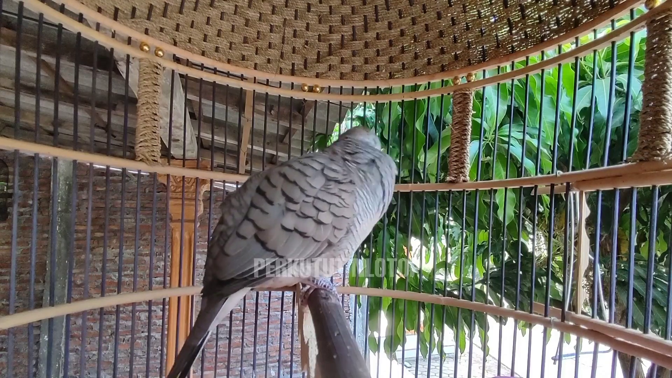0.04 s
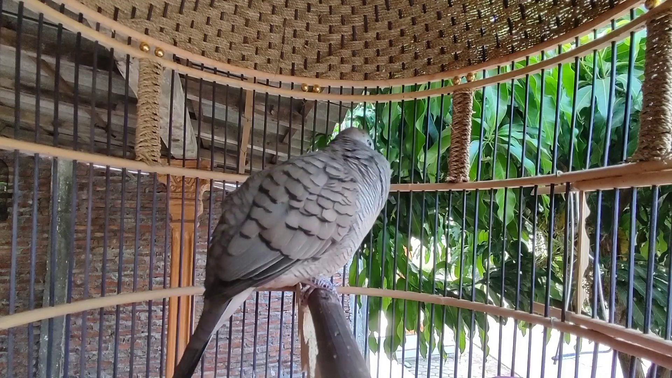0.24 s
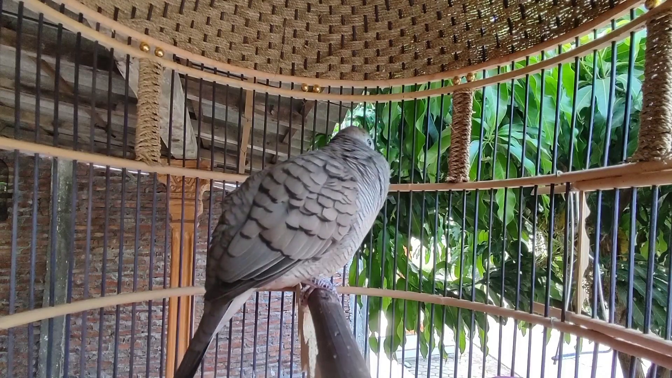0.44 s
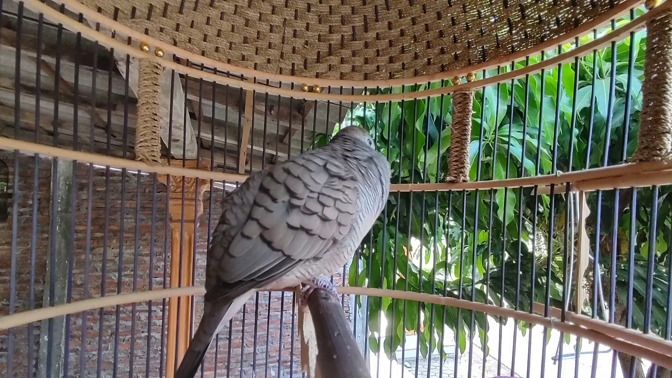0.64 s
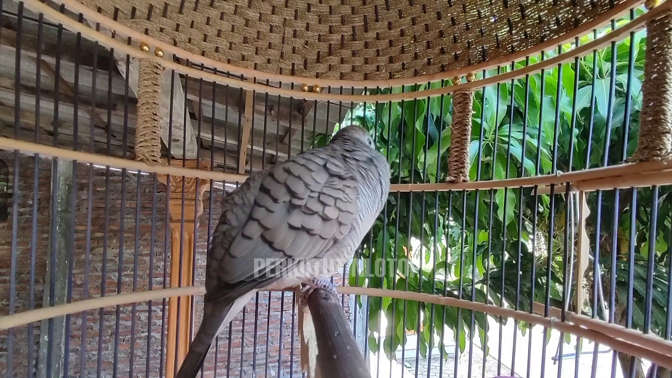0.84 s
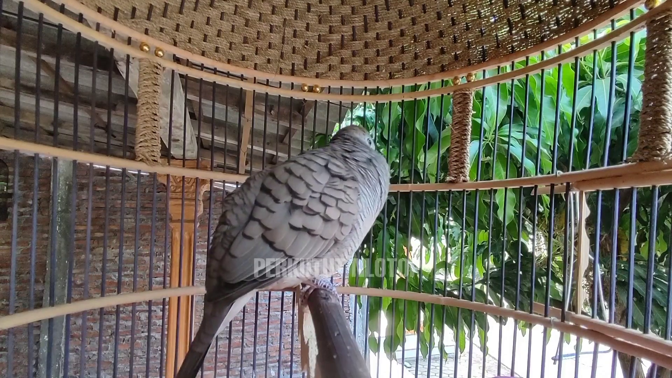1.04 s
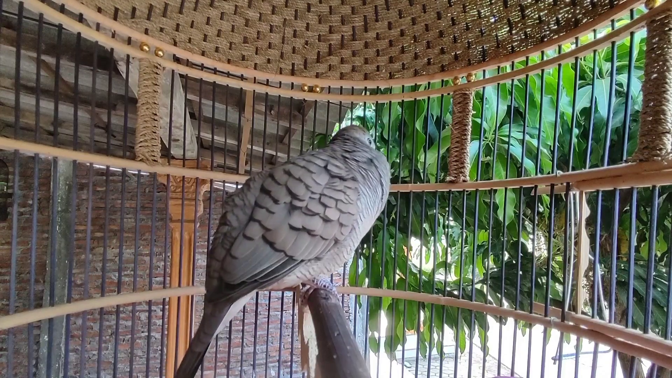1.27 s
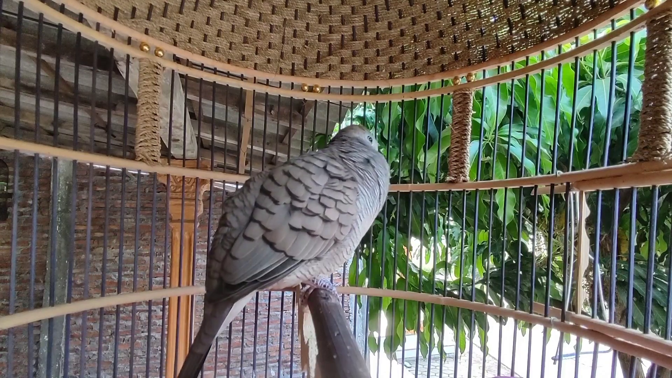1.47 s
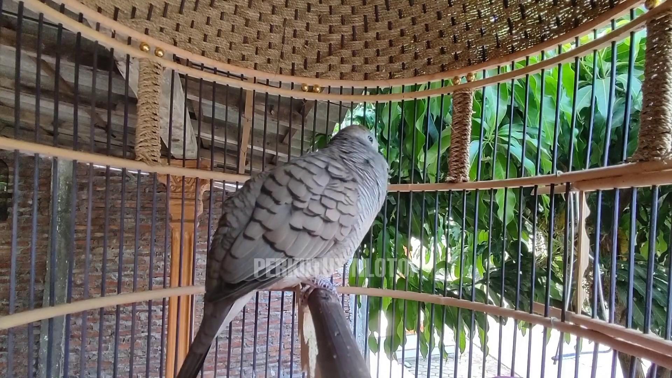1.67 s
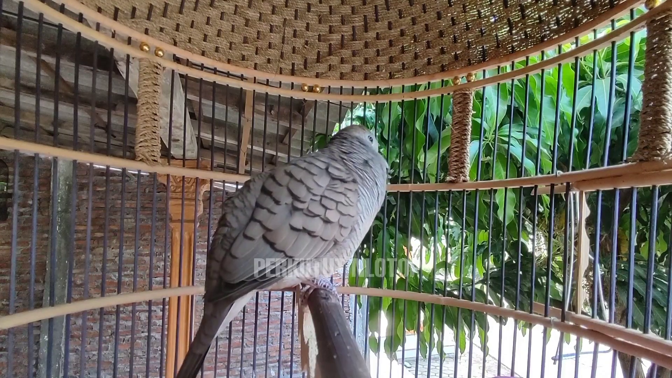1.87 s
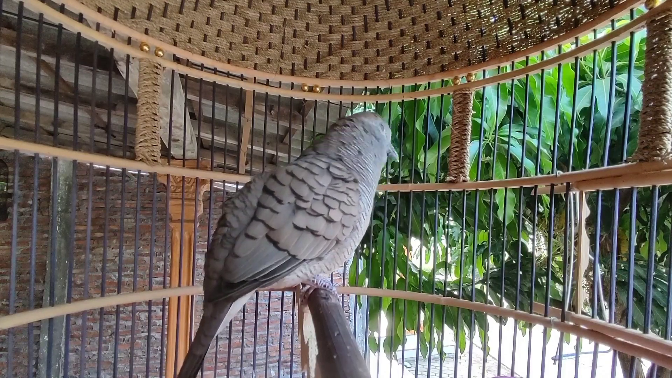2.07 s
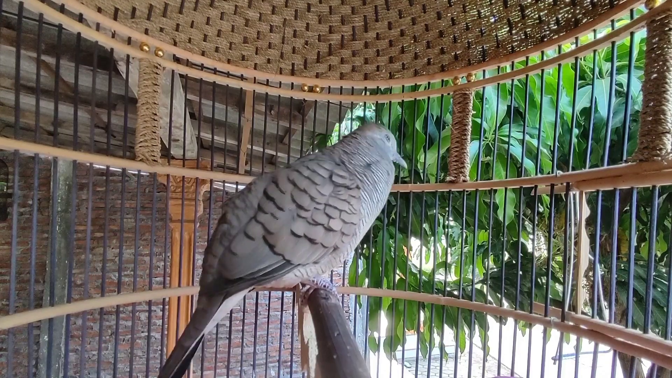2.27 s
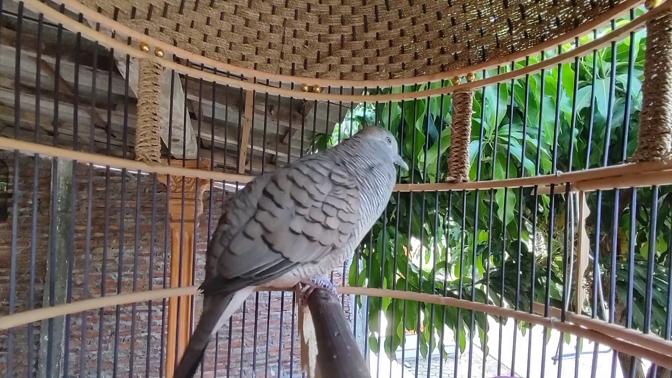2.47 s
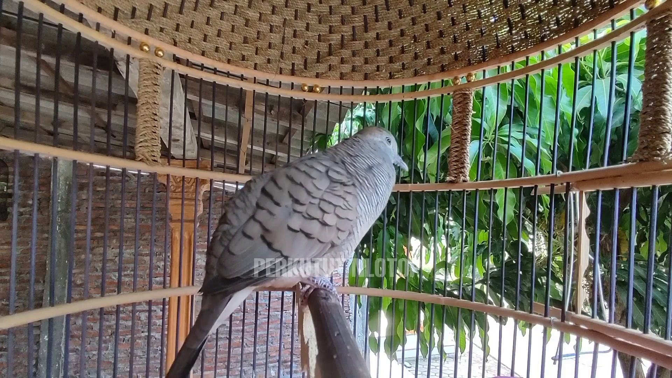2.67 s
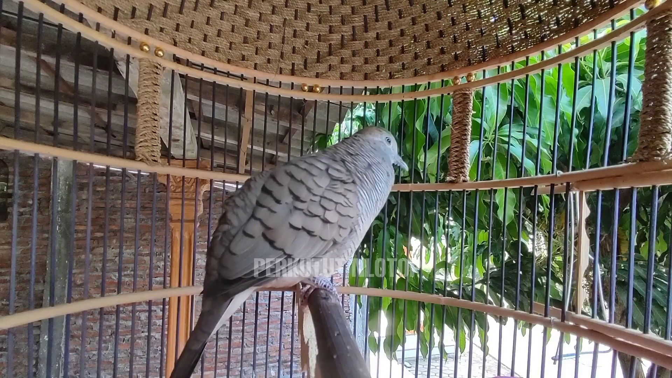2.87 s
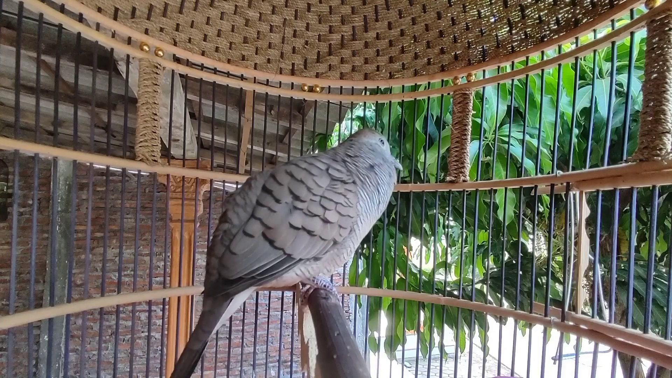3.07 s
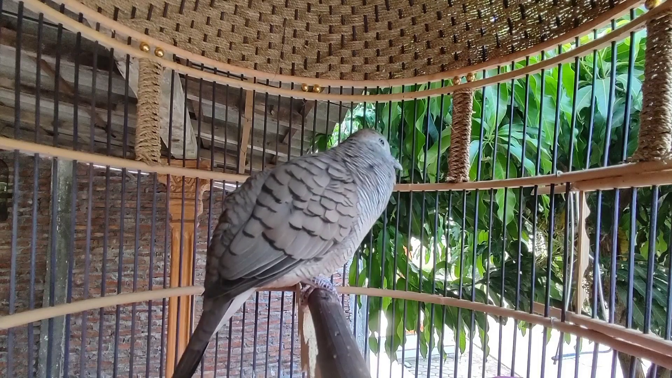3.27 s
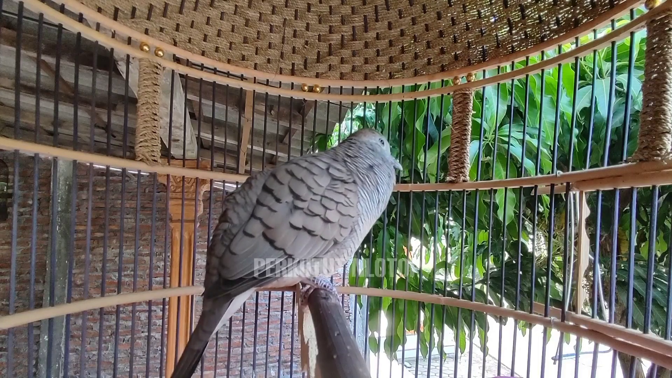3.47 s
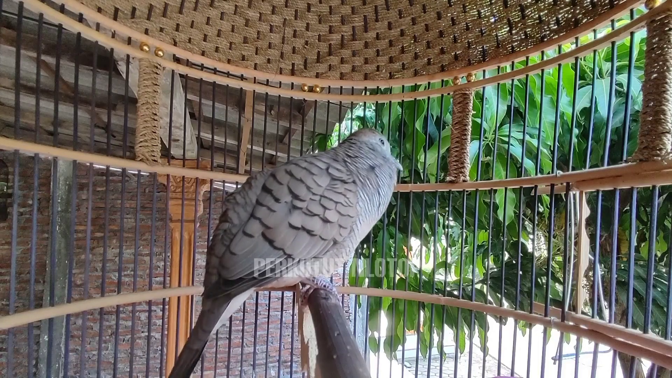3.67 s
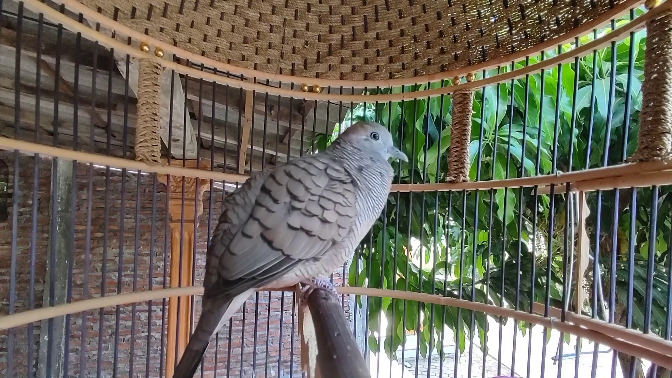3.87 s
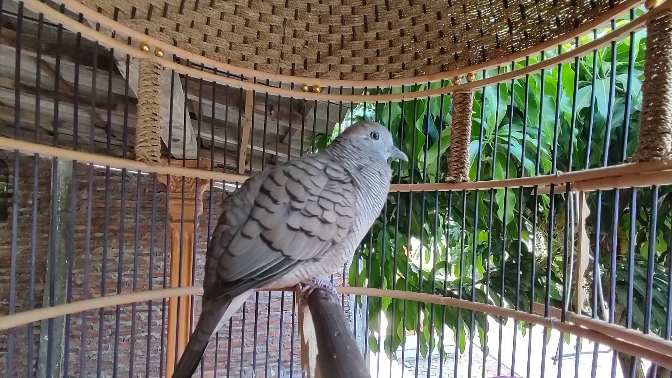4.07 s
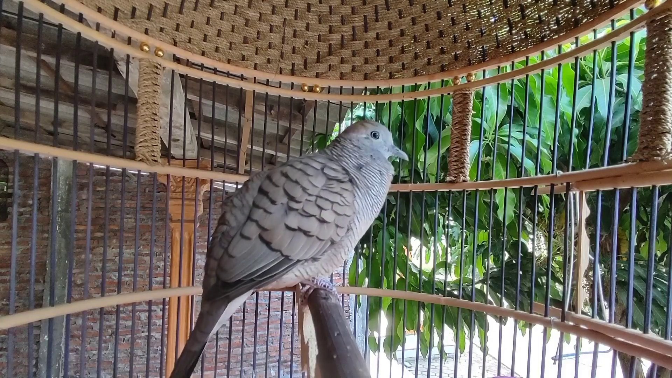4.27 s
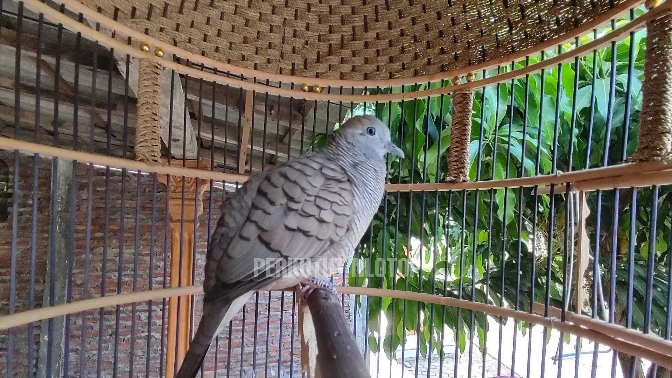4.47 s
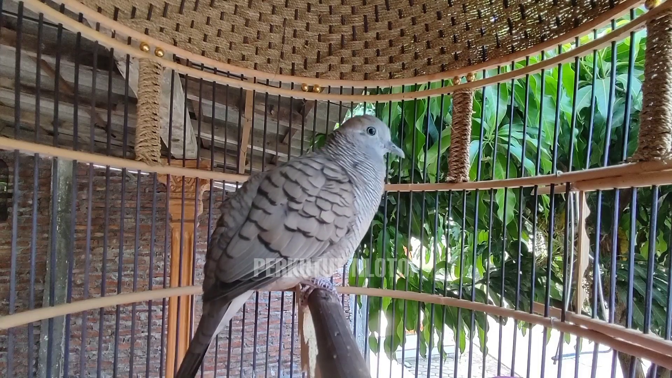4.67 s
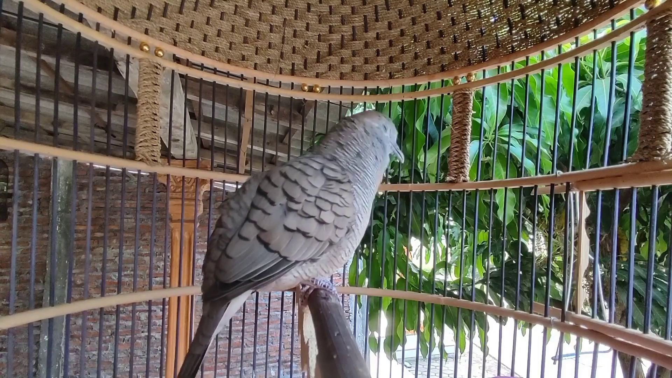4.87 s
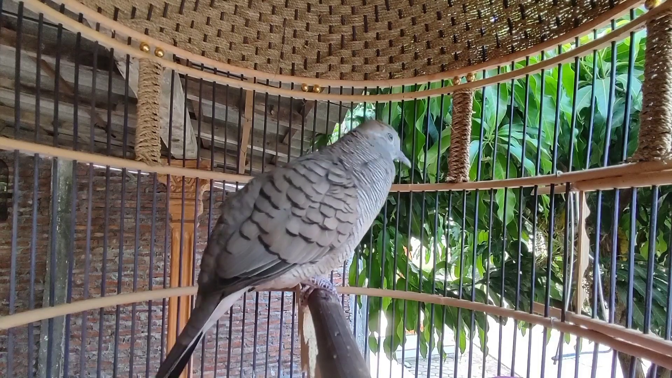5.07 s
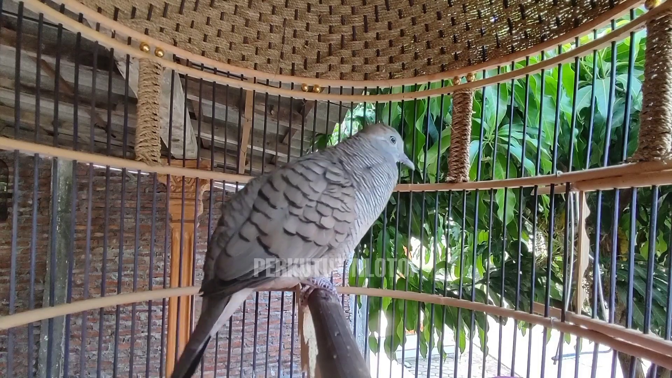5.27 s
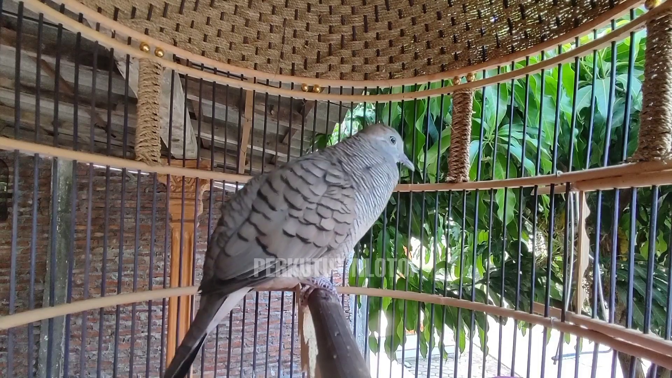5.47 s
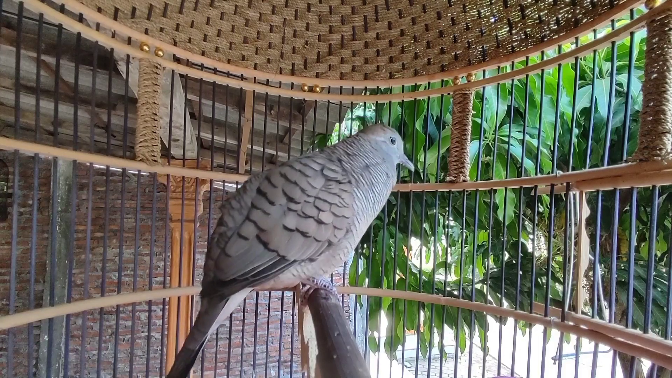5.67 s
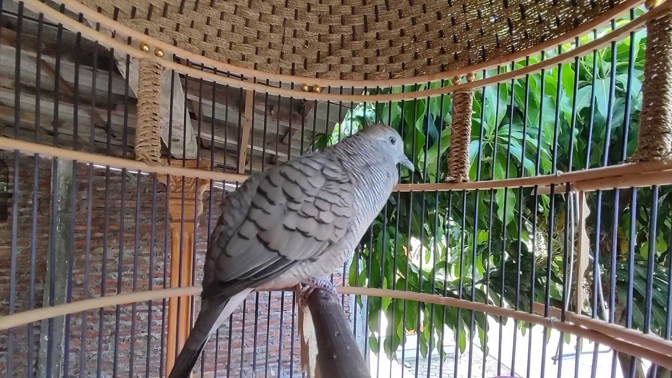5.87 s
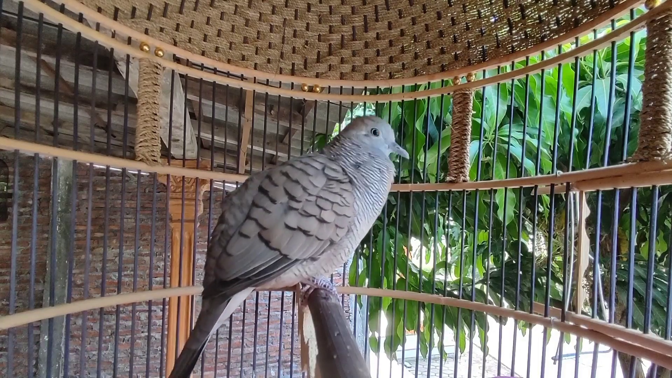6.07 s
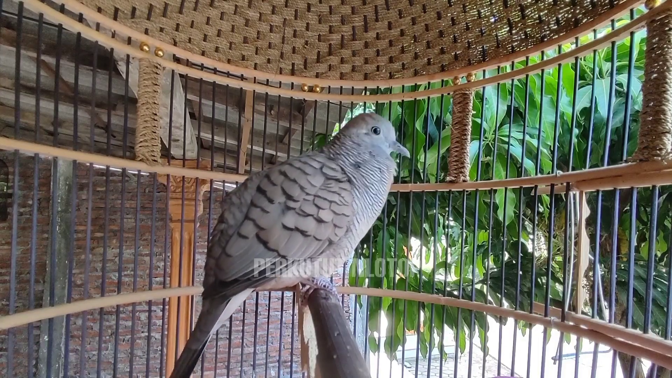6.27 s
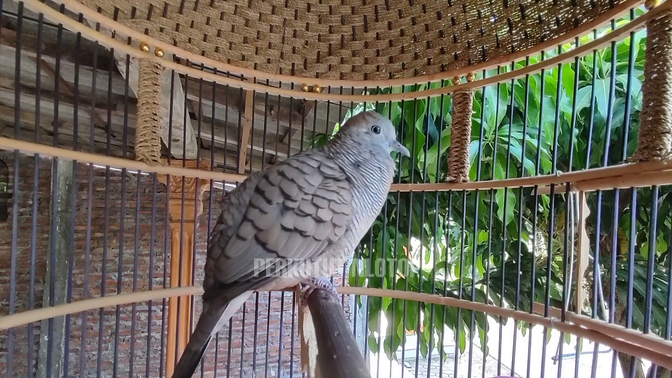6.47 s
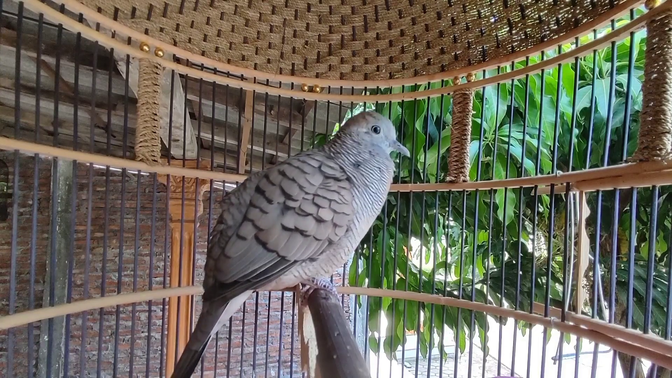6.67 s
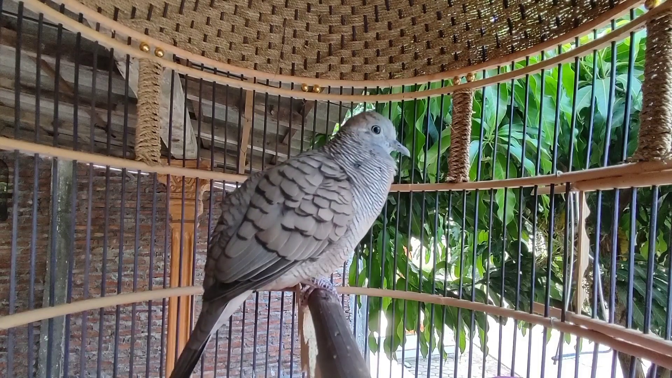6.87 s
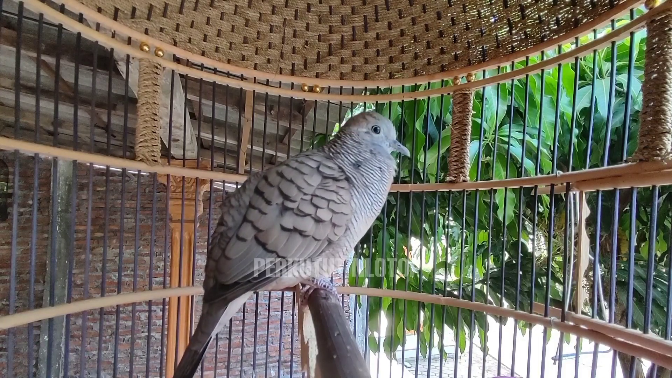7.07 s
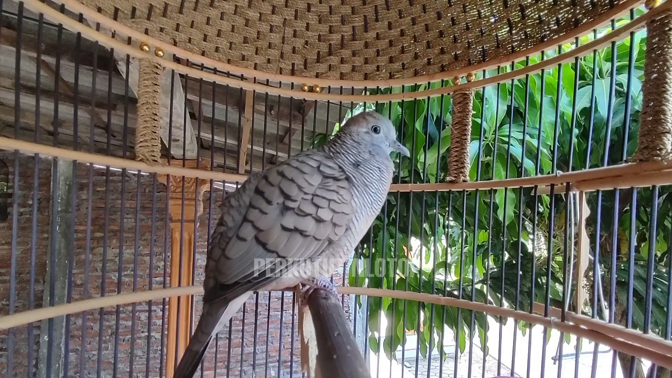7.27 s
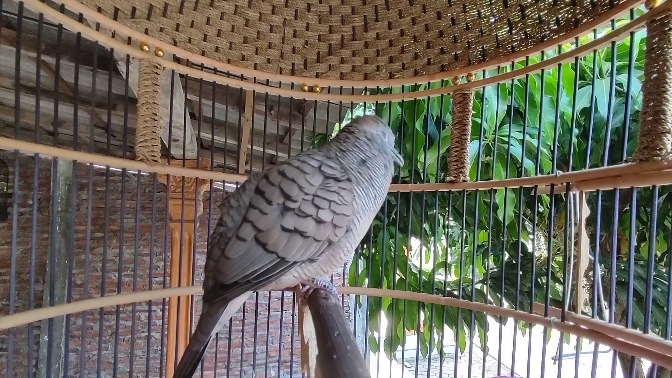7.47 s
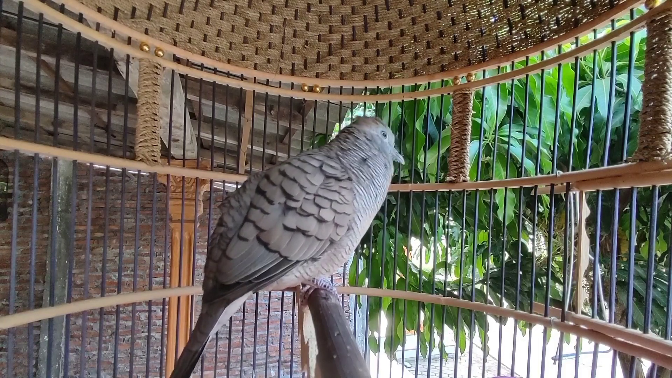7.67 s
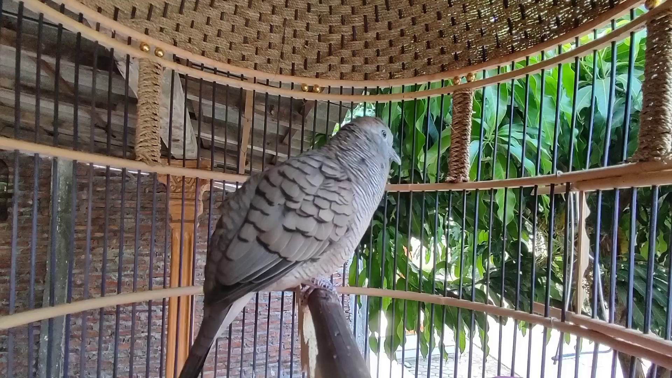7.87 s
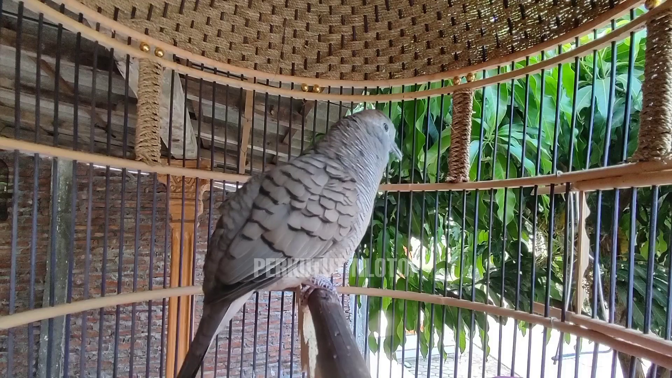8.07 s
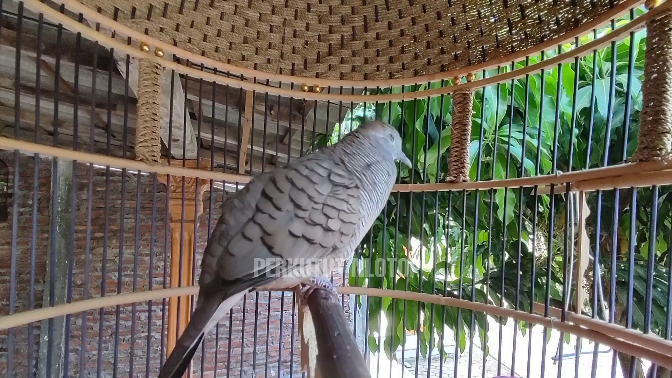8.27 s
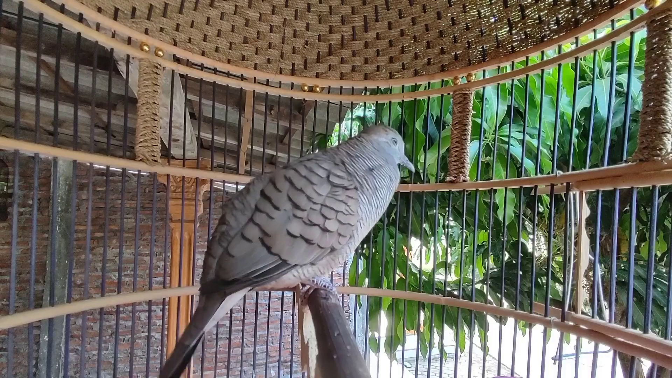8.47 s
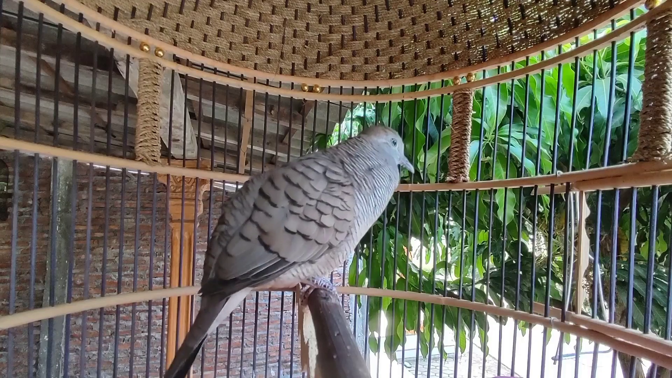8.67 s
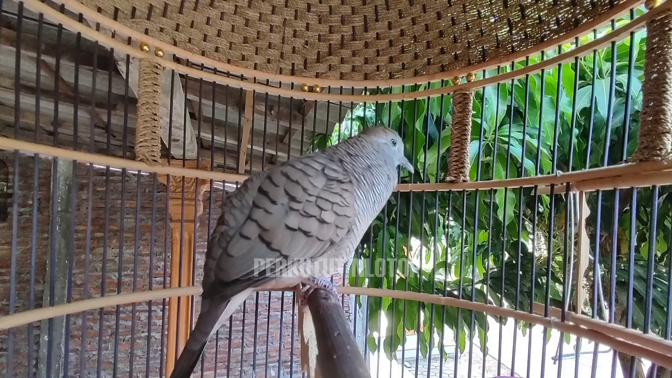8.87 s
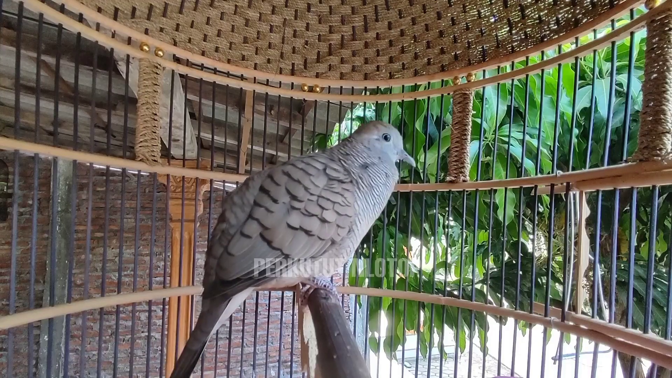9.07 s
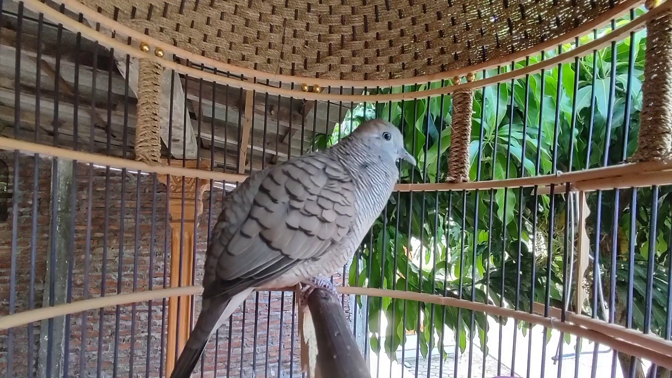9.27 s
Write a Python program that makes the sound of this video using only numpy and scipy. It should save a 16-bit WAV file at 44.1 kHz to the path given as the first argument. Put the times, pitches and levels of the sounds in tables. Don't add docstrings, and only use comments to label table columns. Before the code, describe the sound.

A very quiet porch beside a garden, heard in close stereo: low distant traffic hum, faint leaf rustle and soft hiss. From 0.2 to 1.3 seconds, faraway doves coo dimly with blurred echoes, among tiny bird pipings and thin high chirps. At 2.25 a nearby caged dove calls suddenly, far louder than everything else: a small throat tick, a rolling warbled note around 1150 hertz lasting a fifth of a second, two very short clipped notes, then a held note, ending by 2.8. The tone is hollow and fluty with a bright buzzy edge and short wooden reflections. A sharp cage tick comes at 3.1, then almost inaudible foot rubs until 3.9. Faint birds and a distant dove answer from 4.2 to 5. The call repeats at 5.1 and again at 8.3, nearly identical. Between them come sparse chirps, and small scolds and whistles at 7.3 to 8.2. Quiet hum and chirps close.

```python
import sys
import numpy as np
from scipy import signal
from scipy.fft import rfft, irfft, next_fast_len
from scipy.io import wavfile
from scipy.ndimage import uniform_filter1d, map_coordinates

SR = 44100
rng = np.random.default_rng(int(sys.argv[2]) if len(sys.argv) > 2 else 0)


def how_loud(loudness_db):
    steps = np.asarray(loudness_db, float) / 20
    return 10 ** steps


def waveform_to_disk(signal):
    frames = np.transpose(np.atleast_2d(signal))
    scaled = np.clip(frames, -1, 1) * 32767
    samples = np.round(scaled).astype(np.int16)
    wavfile.write(sys.argv[1], SR, samples)


N = 411012

# after_onset_s, pulse_rate_hz, effort_db
LONG_SHAPE = [(0.0, 194.0, -30.3), (0.0179, 317.0, -8.8), (0.0228, 617.0, -8.9), (0.0302, 945.0, 0.1),
              (0.0451, 1003.0, 3.8), (0.0489, 1159.0, 4.2), (0.0663, 1191.0, 4.0), (0.1413, 1165.0, 2.2),
              (0.2103, 1116.0, 2.3), (0.2232, 1097.0, -18.4)]
SHORT_SHAPE = [(0.0, 342.0, -24.9), (0.0067, 437.0, -15.2), (0.0077, 795.0, -7.6), (0.014, 1017.0, 0.9),
               (0.0189, 1103.0, 1.7), (0.0293, 1115.0, 1.0), (0.0383, 1082.0, -2.1),
               (0.0495, 1055.0, -22.9)]
HELD_SHAPE = [(0.0, 223.0, -28.3), (0.0088, 483.0, -20.1), (0.0118, 810.0, -9.5), (0.0173, 942.0, -0.9),
              (0.0245, 1113.0, -0.6), (0.0422, 1134.0, 0.9), (0.0852, 1127.0, -0.3), (0.1123, 1072.0, -4.4),
              (0.1246, 1064.0, -26.1)]
# start_s, level_db, pitch_factor, stretch_factor
LONG_NOTES = [
    (2.2676, -19.5, 1.002, 0.987),
    (5.1149, -19.2, 1.002, 1.003),
    (8.2919, -19.2, 1.001, 0.984),
]
SHORT_NOTES = [
    (2.4941, -18.8, 0.995, 0.965),
    (2.5683, -17.5, 0.997, 0.973),
    (5.3473, -18.0, 0.999, 0.875),
    (5.4218, -17.6, 1.004, 0.947),
    (8.5138, -18.2, 1.005, 0.914),
    (8.5849, -17.7, 0.99, 0.942),
]
HELD_NOTES = [
    (2.6479, -17.1, 1.0, 1.006),
    (5.5021, -17.0, 1.001, 0.974),
    (8.6628, -16.7, 0.997, 1.0),
]
# rate_hz, depth_hz, first_crest_s
WARBLE = (24.1, 24, .0738)
# start_s, peak_db
THROAT_TICKS = [
    (2.233, -31),
    (5.079, -29.5),
    (8.257, -29),
]
# frequency_hz, level_db
THROAT_LEFT = [(487, -16), (934, 1.5), (1368, -0.04), (1910, -22.5), (2240, -39), (3400, -48),
               (14000, -52.5)]
THROAT_RIGHT = [(577, -15), (947, 4), (1320, 3), (1886, -33.5), (2240, -41.5), (3400, -48), (14000, -58)]
# frequency_hz, level_db
BEAK_LEFT = [(1500, -94), (1900, -44), (2240, -40.5), (2400, -44), (3400, -51.5), (4500, -53), (4750, -55),
             (5700, -45.5), (6450, -58), (6800, -47.5), (7200, -48.5), (7800, -59), (8200, -60),
             (8900, -51), (9400, -59), (11300, -60.5), (12500, -60.5), (14000, -65)]
BEAK_RIGHT = [(1500, -90.5), (1900, -37.5), (2200, -27), (2350, -41), (3400, -34), (4000, -49), (4500, -44),
              (4700, -56), (4860, -46.5), (5500, -48), (6000, -43), (6450, -43.5), (6850, -28.5),
              (7230, -35), (7800, -41), (8300, -51), (8800, -57.5), (10000, -58), (11000, -54),
              (12000, -54.5), (12600, -61.5), (14000, -62)]
# direct_db, scattered_db
SCATTER_DB = (-3, -4.5)
# delay_ms, signed_pressure
PORCH_LEFT = [(0.04, -1.35), (1.89, 0.51), (2.53, -0.32), (4.55, -0.61), (5.93, 0.2), (7.74, -0.34),
              (10.29, 0.22), (12.63, -0.08), (16.09, -0.16), (20.2, -0.08), (23.16, 0.17), (26.55, -0.2),
              (29.17, 0.09), (33.01, 0.02), (36.63, -0.11), (40.25, -0.04), (42.84, -0.1), (46.81, -0.02),
              (50.92, -0.02), (55.65, 0.05), (60.98, -0.02), (67.23, 0.06), (73.93, 0.01), (81.95, 0.03),
              (93.77, 0.06), (100.2, -0.07), (107.79, 0.01), (120.0, -0.01)]
PORCH_RIGHT = [(-0.11, -0.8), (0.39, 1.0), (1.39, -2.43), (1.87, -0.74), (4.33, -0.34), (4.65, -0.97),
               (6.46, -0.22), (7.13, 0.46), (9.42, 0.14), (12.39, 0.45), (12.73, 0.02), (16.62, 0.11),
               (19.62, 0.26), (21.81, 0.07), (25.36, -0.2), (27.7, 0.04), (31.12, 0.02), (35.54, -0.12),
               (40.86, -0.09), (47.14, 0.03), (54.14, 0.05), (60.73, -0.08), (66.87, 0.02), (74.12, 0.08),
               (84.29, 0.08), (87.58, 0.06), (89.18, 0.05), (98.14, -0.04)]
# frequency_hz, fade_s
PORCH_FADE = [(300, 0.46), (1100, 0.31), (1350, 0.13), (3000, 0.14), (8000, 0.15)]
WICKER_FADE = [(2000, .075), (10000, .06)]
HEDGE_FADE = [(2000, .34), (5000, .3)]
GARDEN_FADE = [(300, 0.44), (1100, 0.44), (4000, 0.92), (8000, 0.047)]
# start_s, peak_db
TWIG_CLICKS = [
    (1.5258, -60),
    (3.0912, -41),
    (4.6312, -60),
]
# start_s, peak_db
FOOT_SHUFFLES = [
    (3.165, -62),
    (3.32, -61),
    (3.45, -68),
    (3.6, -69),
    (3.83, -70),
]
# after_onset_s, pitch_hz, level_db
FAR_LONG_SHAPE = [(0, 960, 4.5), (.009, 1000, -2.5), (.017, 1170, -2), (.097, 1214, -1.5),
                  (0.166, 1140, -2.5), (.23, 1080, -6), (.3, 1047, -6.5), (.333, 984, -4)]
FAR_SHORT_SHAPE = [(0, 941, -8), (.009, 1112, -5), (.055, 1150, -14.5), (.085, 1105, -20)]
# start_s, level_db, stretch_factor
FAR_LONG_NOTES = [
    (.412, -47.5, 0.92),
    (4.628, -47.5, 0.92),
]
FAR_SHORT_NOTES = [
    (.783, -42.5, 0.92),
    (.885, -44.5, 2.2),
    (.979, -37, 0.28),
    (4.985, -43, 2.2),
    (8.228, -46.5, 1.34),
]
# start_s, length_s, first_pitch_hz, last_pitch_hz, level_db
THIRD_DOVE = [
    (.9, 0.177, 1363, 1270, -68.5),
]
DRONE_COOS = [(0.22, 0.13, 926, 930, -88), (.33, 0.17, 926, 956, -82.5), (.6, 0.28, 925, 925, -78),
              (.84, 0.12, 950, 930, -78), (1.17, 0.11, 905, 937, -80.5), (1.38, 0.086, 953, 944, -83),
              (3.35, 0.079, 1035, 1050, -78.5), (5.4, 0.18, 305, 306, -66.5)]
DEEP_COOS = [
    (0.16, 0.15, 402, 422, -56.5),
    (.31, 0.084, 414, 419, -50.5),
    (1.68, 0.16, 442, 431, -61),
]
# start_s, length_s, first_pitch_hz, last_pitch_hz, level_db
WHISTLES = [(.54, .04, 2700, 2850, -66), (.575, .05, 2900, 3950, -66), (.63, .1, 3920, 3900, -73),
            (8.008, .04, 2280, 2650, -62), (8.04, .05, 2650, 4080, -56), (8.09, .055, 4110, 4100, -65),
            (8.2, .07, 4100, 4080, -72), (8.165, .025, 2900, 3700, -63), (7.425, .045, 4150, 3500, -70)]
SCOLDS = [
    (7.338, .014, 4500, 4470, -66),
    (7.368, .03, 4480, 4370, -60),
    (7.42, .03, 4680, 4590, -58),
    (4.31, .035, 3150, 3760, -65),
]
PIPINGS = [(.24, 0.059, 2930, 3250, -65.5), (1.26, 0.055, 4420, 4140, -72), (1.35, 0.031, 4090, 4300, -69),
           (1.39, 0.13, 4890, 4810, -74), (0, 0.018, 4200, 3760, -65), (.33, 0.023, 4240, 4080, -66),
           (1.94, 0.032, 3830, 3760, -74.5), (2.005, 0.038, 4500, 4380, -58.5),
           (2.048, 0.046, 4430, 4170, -61.5), (2.11, 0.065, 4140, 3860, -69),
           (4.24, .06, 3850, 3760, -67.5), (4.33, 0.035, 4440, 4530, -59), (4.4, 0.074, 4790, 4500, -62.5),
           (4.305, 0.024, 2993, 3074, -61.5), (4.4, 0.066, 3020, 2946, -64),
           (4.505, 0.031, 3360, 3320, -70), (4.76, 0.059, 3370, 3210, -64),
           (5.075, 0.052, 3380, 3180, -67.5), (5.82, 0.066, 3550, 3666, -72.5),
           (5.93, 0.069, 2910, 2720, -73.5), (6.31, 0.028, 4570, 3910, -66.5),
           (7.58, 0.033, 4870, 4860, -69), (7.62, 0.03, 4760, 4460, -64), (8.96, 0.096, 4460, 4220, -69)]
# start_s, peak_db, pitch_hz
CHIRPS = [(0.1002, -64, 7700), (0.4223, -69, 7800), (0.586, -64, 7760), (1.5823, -62, 7700),
          (2.1191, -70, 7780), (2.781, -61, 7670), (.3, -65, 7600), (7.25, -65, 7500), (3.093, -67, 7700),
          (3.5978, -65, 7800), (4.4003, -64, 7740), (4.8379, -64, 7750), (5.94, -70, 7650),
          (6.1598, -66.5, 7500), (6.2245, -62.5, 7630), (6.675, -69, 7600), (6.831, -60.5, 7590),
          (7.048, -65.5, 7840), (7.567, -60, 7860), (7.786, -57.5, 7450), (8.237, -55, 7740),
          (8.9432, -60, 7670), (9.1456, -62, 7600)]
# frequency_hz, level_db
HUM_COLOUR = [(19, -30), (40, 3), (53, -5.5), (70, -6), (155, -5), (232, -8), (255, -8), (394, -9.5),
              (510, -16), (763, -19), (1500, -34), (1950, -64.5), (3300, -120)]
RUSTLE_COLOUR = [(590, -27), (1000, 1), (1510, -2), (2070, -2.5), (3800, -5.5), (4120, -6.5), (6000, -18.5),
                 (7800, -37), (13200, -120)]
HISS_COLOUR = [(2940, -36.5), (5000, -10), (6870, 0), (7670, -3.5), (8640, -4), (14400, -7.5)]
# frequency_hz, likeness (1 = same)
ALIKE = [(60, 0.9), (180, .97), (400, .92), (1000, .5), (3000, 0.47), (10000, 0.18)]
# frequency_hz, left_minus_right_db
LEAN = [(60, -2), (230, -2.5), (910, -1), (3560, -5), (13900, -3)]
# start_s, length_s, lift_db
GATE_OPENINGS = [(0.148, 0.26, 1.5), (0.427, .22, 4), (0.625, 0.59, 1.5), (1.529, .5, 0.5), (2.214, 0.6, 5),
                 (3.086, 0.17, 0.5), (3.317, 0.17, 3.5), (3.753, 0.1, 1), (4.64, .45, 4), (5.104, .6, 6.5),
                 (6.428, 0.13, 2), (7.295, 0.4, 1.9), (8.009, 0.24, 1.5), (8.274, 0.57, 5.5),
                 (8.849, 0.23, 2)]


def unit(x):
    return x / np.sqrt(np.mean(x ** 2) + 1e-20)


def along(points, hz):
    f, v = np.transpose(points)
    return np.interp(np.log(hz + 1), np.log(f + 1), v)


def filtered(x, response):
    m = next_fast_len(N + SR // 4)
    return irfft(rfft(x, m) * response(np.fft.rfftfreq(m, 1 / SR)), m)[..., :N]


def causal(x, spectrum):
    cepstrum = irfft(np.log(how_loud(along(spectrum, np.fft.rfftfreq(4096, 1 / SR)))))
    cepstrum = np.r_[cepstrum[0], 2 * cepstrum[1:2048], np.zeros(2048)]
    return signal.fftconvolve(x, irfft(np.exp(rfft(cepstrum))))[:N]


def tail(x, fade, gap):
    hz, t, z = signal.stft(rng.standard_normal((2, SR // 2)), SR, nperseg=256)
    ring = signal.istft(z * how_loud(-60 * t / along(fade, hz)[:, None]), SR, nperseg=256)[1]
    ring = np.pad(ring / np.linalg.norm(ring[0]), ((0, 0), (int(gap * SR), 0)))
    return signal.fftconvolve(x[None], ring, axes=1)[:, :N]


def add(track, s, x):
    track[round(s * SR):][:len(x)] += x


def dove():
    voice = syrinx(LONG_NOTES, LONG_SHAPE, WARBLE[1], breath_db=-51, bright_db=1)
    voice += syrinx(SHORT_NOTES, SHORT_SHAPE, 0, breath_db=-42, bright_db=1.2)
    voice += syrinx(HELD_NOTES, HELD_SHAPE, 0, breath_db=-46, bright_db=2.5)
    for s, db in THROAT_TICKS:
        add(voice, s, how_loud(db + 22.5) * np.array([1.]))
    throat = np.array([causal(voice, THROAT_LEFT), causal(voice, THROAT_RIGHT)])
    beak = np.array([causal(voice, BEAK_LEFT), causal(voice, BEAK_RIGHT)])
    scattered = np.array([tail(beak[port], WICKER_FADE, gap=.002)[port] for port in (0, 1)])
    direct_db, scattered_db = SCATTER_DB
    tone = filtered(throat, porch) + how_loud([[-34], [-30]]) * tail(throat[1], PORCH_FADE, gap=0.066)
    return tone + how_loud(direct_db) * beak * [[-1], [1]] + how_loud(scattered_db) * scattered


def syrinx(notes, shape, warble_hz, breath_db, bright_db):
    crest_db, ease_s = 3, .006
    out, (s, rate, effort) = np.zeros(N), np.transpose(shape)
    warble_rate_hz, _, first_crest_s = WARBLE
    k = np.arange(1, 60)[:, None]
    for onset, db, factor, stretch in notes:
        t = np.arange(int(s[-1] * stretch * SR)) / SR / stretch
        releasing = t > (s[-4] + s[-3]) / 2

        def eased(x):
            smooth = uniform_filter1d(x, size=int(ease_s * SR), mode="nearest")
            return np.where(releasing, smooth, x)

        warble = np.cos(2 * np.pi * warble_rate_hz * (t * stretch - first_crest_s))
        warble = warble * np.clip((t - .056) / 0.011, 0, 1)
        hz = factor * eased(np.interp(t, s, rate)) + warble_hz * warble
        push_db = eased(np.interp(t, s, effort))
        phase = 2 * np.pi * np.cumsum(hz) / SR
        sharp = how_loud(bright_db + .3 * push_db + crest_db * warble * (warble_hz > 0))
        knots = rng.standard_normal((len(k), 14))
        flicker = np.array([np.interp(t, np.arange(14) / 45, row) for row in knots])
        sharp = sharp * how_loud(2 * flicker)
        strength = (k * hz < 15000) * np.where(k * hz > 1800, sharp, 1)
        pulses = np.sum(np.cos(k * phase) * strength, axis=0)
        slide = np.clip(np.gradient(hz) * SR / 20000, 0, 1) ** 2
        rasp = how_loud(5.5) * slide * np.diff(rng.standard_normal(len(t) + 2), 2)
        breath = how_loud(breath_db) * rng.standard_normal(len(t)) + rasp
        close = np.clip((s[-1] - t) / ease_s * 2, 0, 1)
        add(out, onset, np.sqrt(2) * close * how_loud(db + push_db) * (pulses + breath))
    return out


def porch(hz):
    loss = 45 * np.clip(hz / 1300 - 1, 0, 3)
    paths = [sum(p * np.exp(-ms / 1000 * (2j * np.pi * hz + loss)) for ms, p in port)
             for port in (PORCH_LEFT, PORCH_RIGHT)]
    return np.array(paths) / 1.85 * np.clip((2150 - hz) / 300, 0, 1)


def clicks():
    out, t = np.zeros(N), np.arange(SR // 100) / SR
    throat_edges = [(s, db - 12.5) for s, db in THROAT_TICKS]
    for s, db in TWIG_CLICKS + throat_edges:
        add(out, s, how_loud(db - 60 * t / 0.004) * rng.standard_normal(len(t)))
    out = causal(out, [(800, -10.0), (2500, 1.5), (6000, -5.0), (14000, -12.0)])
    return how_loud(-3.5) * out + how_loud(-10.0) * tail(out, PORCH_FADE, gap=0.0037)


def shuffles():
    out, t = np.zeros(N), np.arange(SR // 10) / SR
    for s, db in FOOT_SHUFFLES:
        swell = 1 - np.exp(-t / .006)
        add(out, s, how_loud(db + 20 - 60 * t / 0.13) * swell * rng.standard_normal(len(t)))
    return causal(out, [(350, -36), (650, 2), (1000, -1), (1500, -22), (5000, -51)])


def far_doves():
    songs = repeats(FAR_LONG_NOTES, FAR_LONG_SHAPE) + repeats(FAR_SHORT_NOTES, FAR_SHORT_SHAPE)
    songs += glides(THIRD_DOVE, fade_db=8)
    drone, deep = glides(DRONE_COOS, fade_db=5.0), glides(DEEP_COOS, fade_db=1.5)
    out = singers(songs, direct_db=-15, wet_db=-1.0, pan_db=-0.5, trill_hz=21)
    out += singers(drone, direct_db=11.0, wet_db=-9.5, pan_db=-2.5)
    return out + singers(deep, direct_db=-5.0, wet_db=-17.0, pan_db=0.0, trill_hz=7.1)


def songbirds():
    whistles, pipings = glides(WHISTLES, fade_db=-2.5), glides(PIPINGS, fade_db=6)
    scolds = glides(SCOLDS, fade_db=9.0)
    out = singers(whistles, direct_db=-3, wet_db=2.5, pan_db=-5, trill_hz=90, fade=HEDGE_FADE)
    out += singers(pipings, direct_db=-4, wet_db=-1, pan_db=-4, trill_hz=60, fade=HEDGE_FADE)
    return out + singers(scolds, direct_db=2.0, wet_db=-8.0, pan_db=-10.0, trill_hz=350)


def glides(rows, fade_db):
    share, swell_db = .2, 6
    return [[(s, a_hz, db - swell_db),
             (s + share * length, a_hz + share * (b_hz - a_hz), db),
             (s + length, b_hz, db - fade_db)] for s, length, a_hz, b_hz, db in rows]


def repeats(notes, shape):
    return [[(onset + s * stretch, hz, db + effort) for s, hz, effort in shape]
            for onset, db, stretch in notes]


def singers(songs, direct_db, wet_db, pan_db, trill_hz=0, fade=GARDEN_FADE):
    out = np.zeros(N)
    for points in songs:
        s, hz, db = np.transpose(points)
        t = np.arange(s[0], s[-1], 1 / SR)
        edges = np.clip(np.minimum(t - s[0], s[-1] - t) / 0.0033, 0, 1)
        pitch = np.interp(t, s, hz) + trill_hz * np.sin(2 * np.pi * 130 * t)
        tone = np.sin(2 * np.pi * np.cumsum(pitch) / SR)
        add(out, s[0], np.sqrt(2) * edges * how_loud(np.interp(t, s, db)) * tone)
    both = how_loud(direct_db) * out + how_loud(wet_db) * tail(out, fade, gap=.004)
    return both * how_loud([[pan_db / 2], [-pan_db / 2]])


def chirps():
    out, t = np.zeros(N), np.arange(SR // 12) / SR
    bend = 1.02 - 0.56 * t + 0.02 * np.sin(2 * np.pi * 110 * t)
    for s, db, hz in CHIRPS:
        phase = 2 * np.pi * np.cumsum(hz * bend) / SR
        add(out, s, how_loud(db - 1.5 - 60 * t / 0.17) * (1 - np.exp(-t / 0.0054)) * np.sin(phase))
    return how_loud(-8.0) * out + how_loud(3.0) * tail(out, GARDEN_FADE, gap=0.005)


def background():
    open_s, close_s = 0.02, 0.052
    hum_db, rustle_db, hiss_db = -59, -69, -73.5
    rustle_grows, hiss_grows = 1.69, 1
    t = np.arange(N) / SR
    lift = sum(db * np.clip(np.minimum((t - s) / open_s, (s + length - t) / close_s) + .5, 0, 1)
               for s, length, db in GATE_OPENINGS)
    treble = np.minimum(lift, 5.5)

    def drift():
        return -0.12 * map_coordinates(rng.standard_normal(60), [t * 5])

    traffic = how_loud(hum_db + lift + drift()) * rush(HUM_COLOUR, patchy_db=.2)
    leaves = how_loud(rustle_db + rustle_grows * treble + drift()) * rush(RUSTLE_COLOUR, patchy_db=2.2)
    hiss = how_loud(hiss_db + hiss_grows * treble + drift()) * rush(HISS_COLOUR, patchy_db=1.5)
    return traffic + leaves + hiss


def rush(spectrum, patchy_db):
    lag_s = .00037
    z = signal.stft(rng.standard_normal((2, N + 512)), nperseg=512)[2]
    patches = uniform_filter1d(rng.standard_normal(z.shape[1:]), size=6, axis=0)
    patches = uniform_filter1d(patches, size=12, axis=1)
    pair = signal.istft(z * how_loud(patchy_db * unit(patches)), nperseg=512)[1][:, :N]

    def colour_and_width(hz):
        turn = np.arccos(np.clip(along(ALIKE, hz), -1, 1)) / 2
        return how_loud(along(spectrum, hz)) * [np.cos(turn), np.sin(turn)]

    mid, side = filtered(pair, colour_and_width)
    half = np.array([[.5], [-.5]])

    def lean_and_lag(hz):
        return how_loud(half * along(LEAN, hz)) * np.exp(2j * np.pi * half * lag_s * hz)

    return unit(filtered(np.array([mid + side, mid - side]), lean_and_lag))


def scene():
    near = dove() + clicks() + shuffles()
    garden = far_doves() + songbirds() + chirps()
    return near + garden + background()


def roll_off(x):
    return signal.sosfilt(signal.butter(12, 14500, fs=SR, output="sos"), x)


def record(dry):
    top_hz = 14330
    mix = filtered(dry, lambda hz: hz < top_hz)
    return roll_off(mix)


dry = scene()
out = record(dry)
waveform_to_disk(out)
```